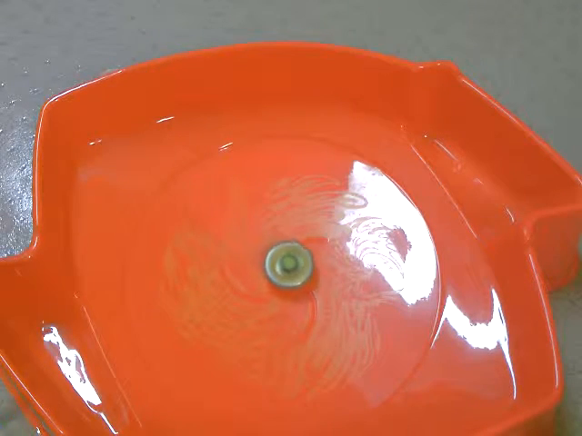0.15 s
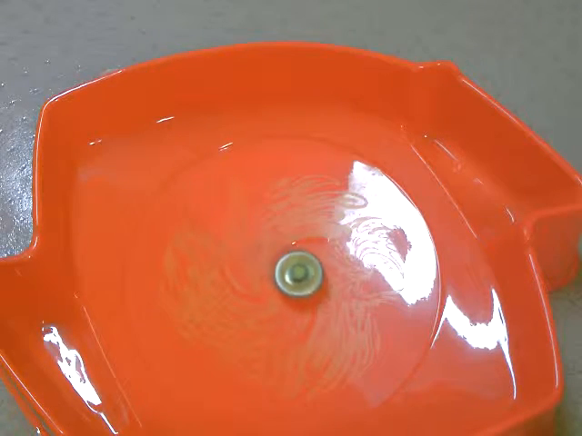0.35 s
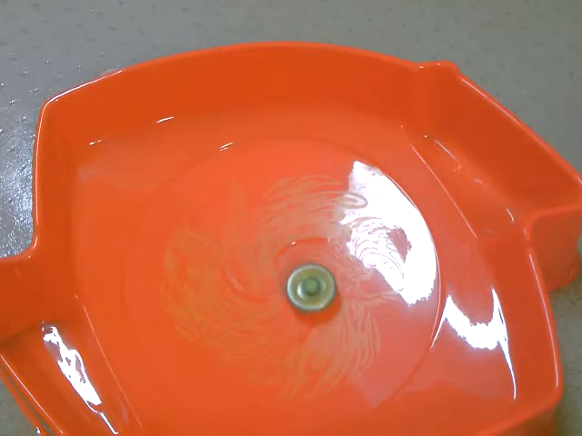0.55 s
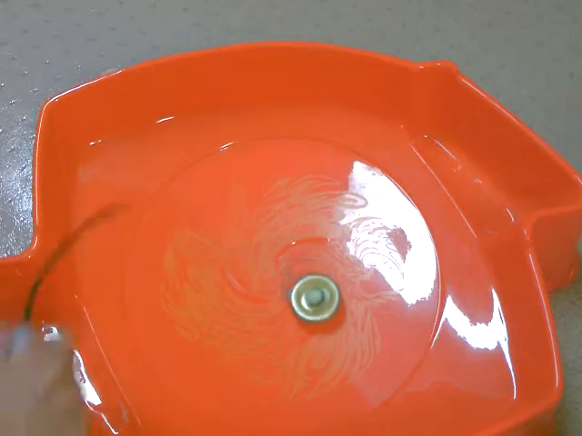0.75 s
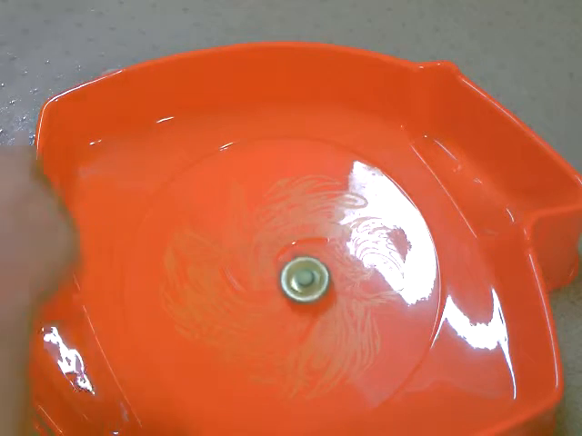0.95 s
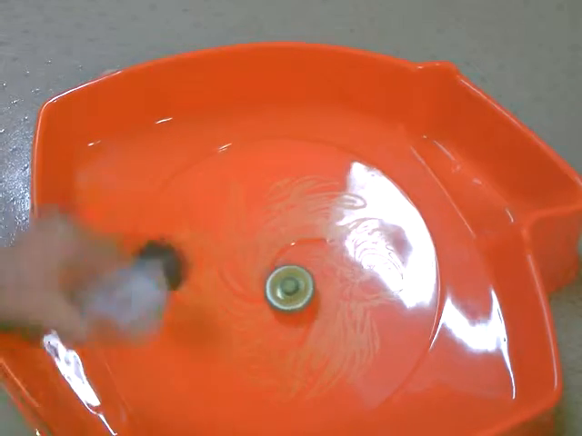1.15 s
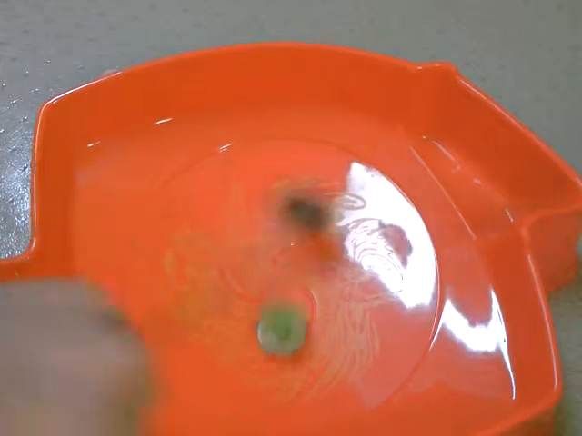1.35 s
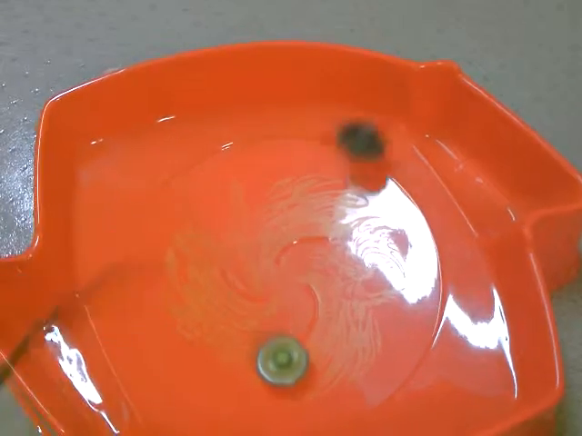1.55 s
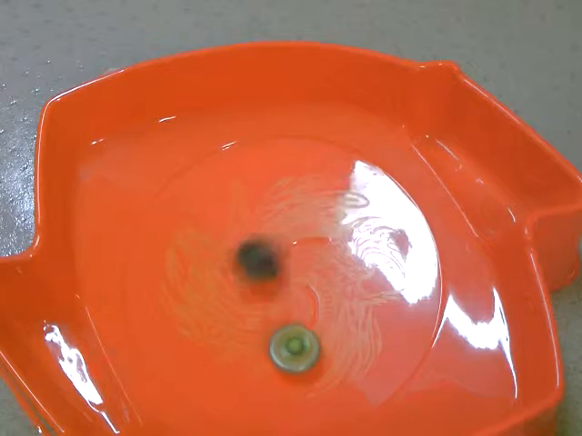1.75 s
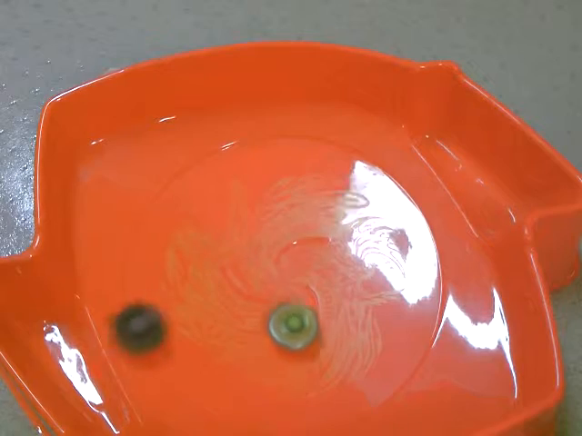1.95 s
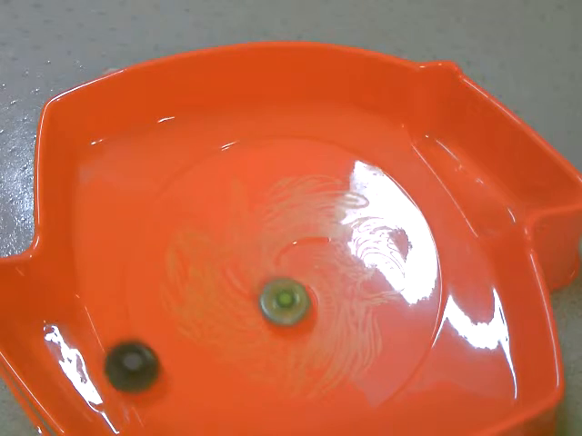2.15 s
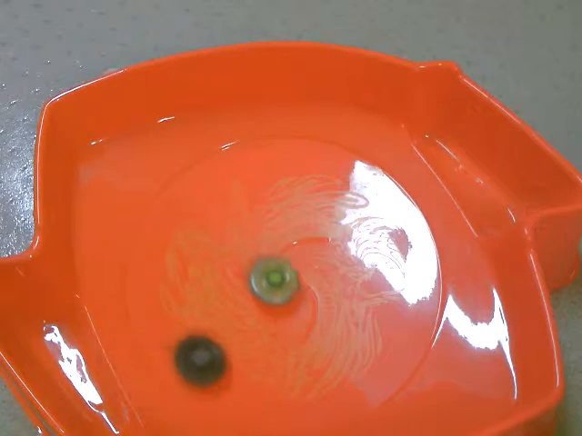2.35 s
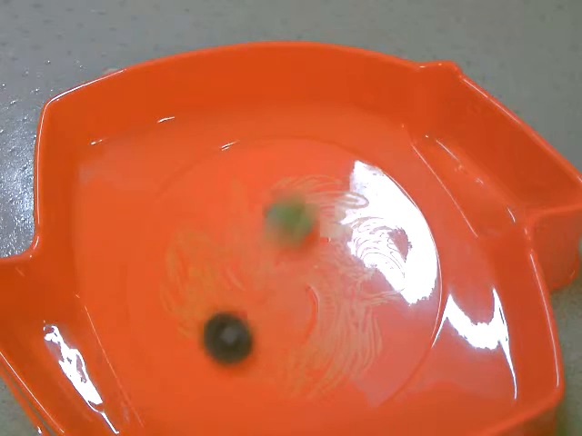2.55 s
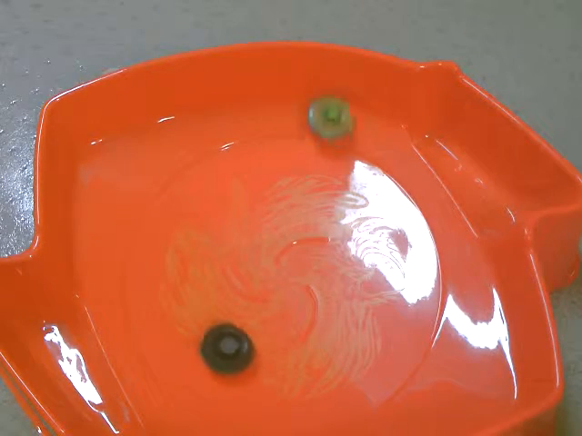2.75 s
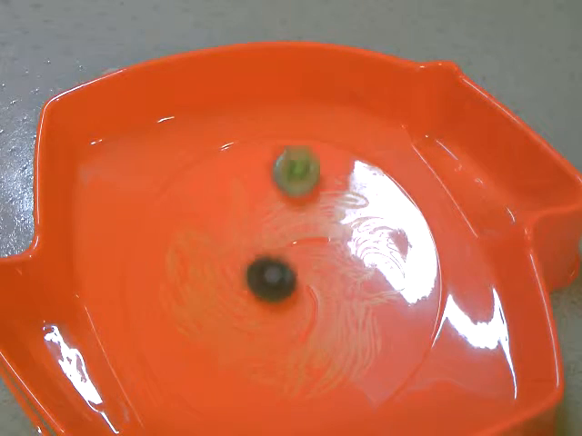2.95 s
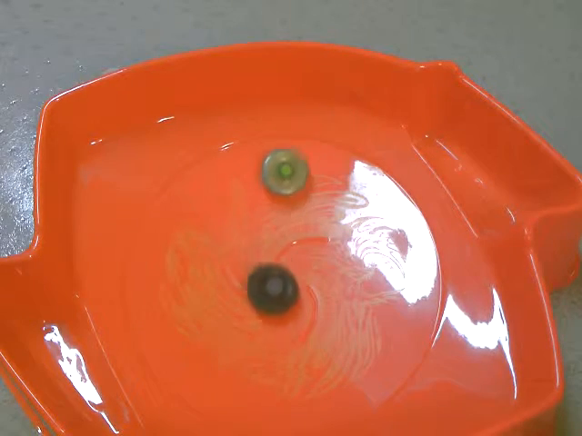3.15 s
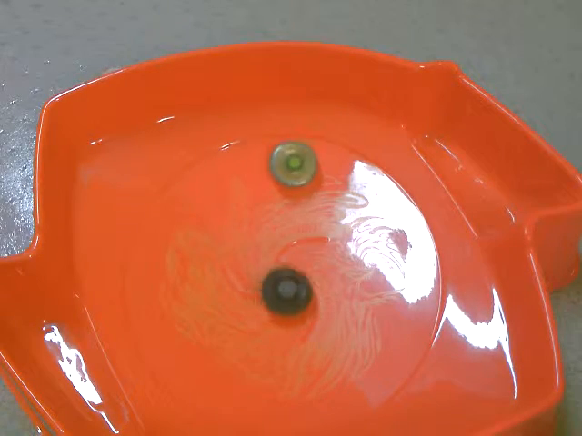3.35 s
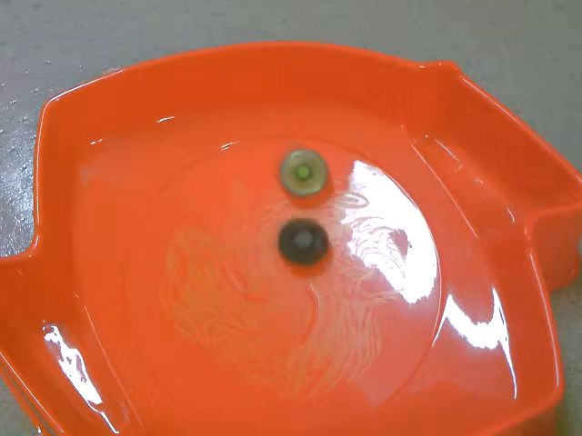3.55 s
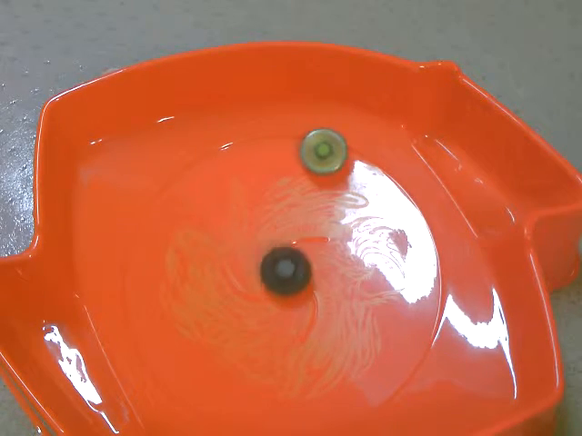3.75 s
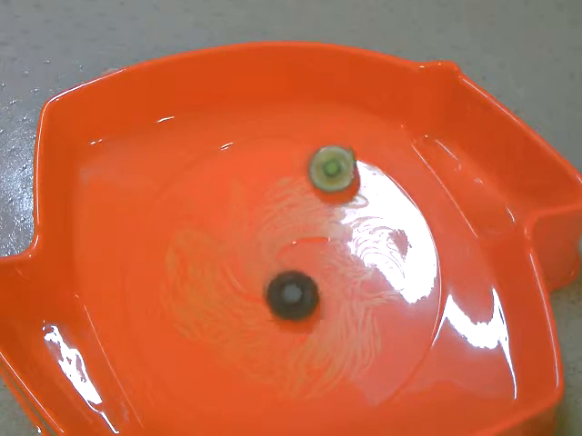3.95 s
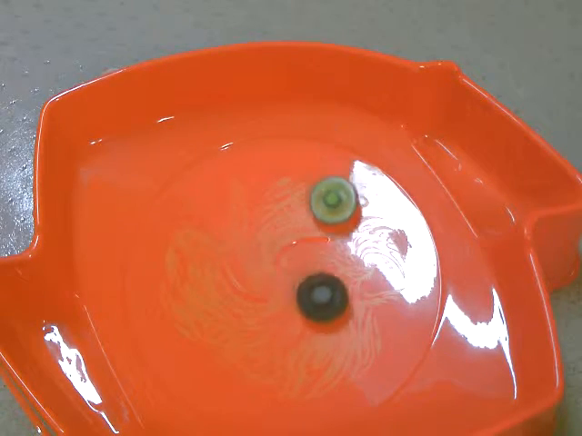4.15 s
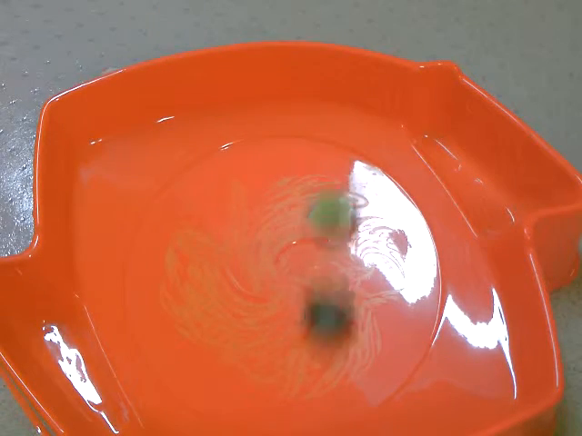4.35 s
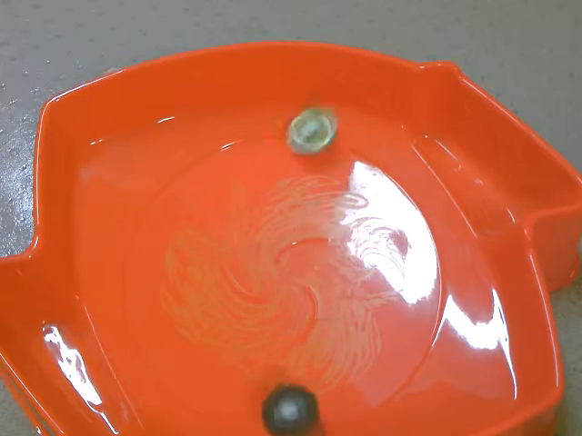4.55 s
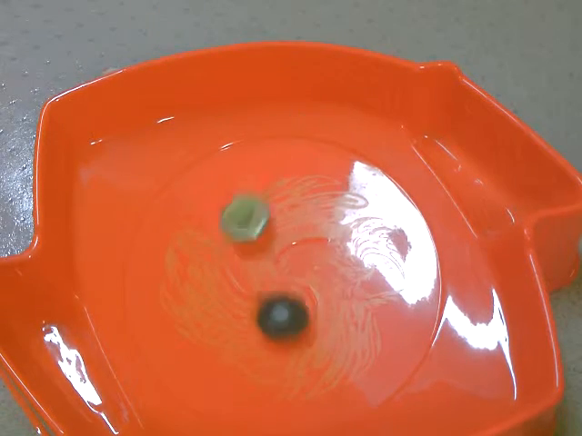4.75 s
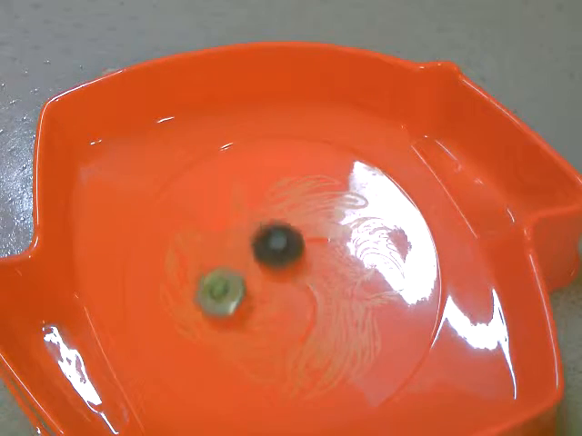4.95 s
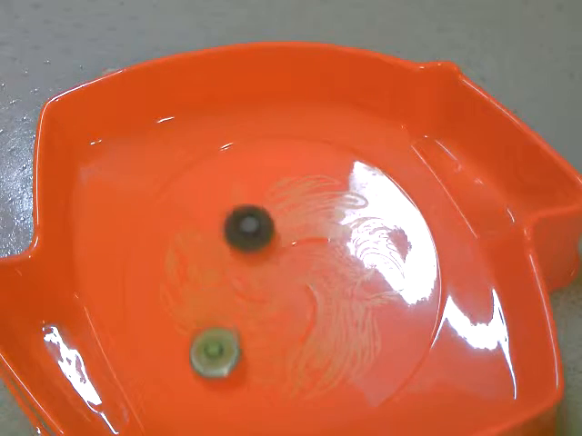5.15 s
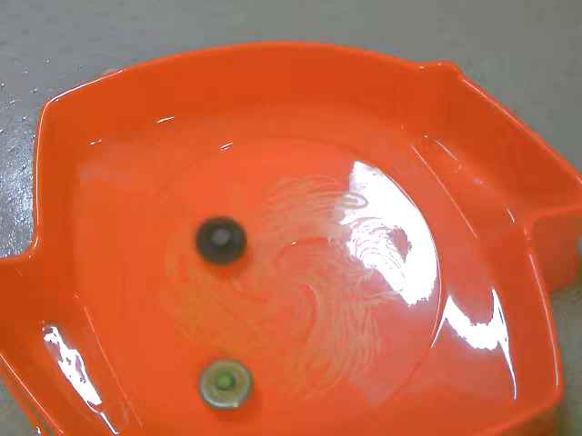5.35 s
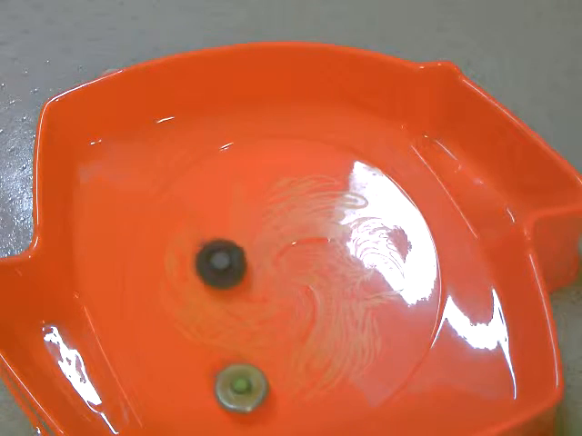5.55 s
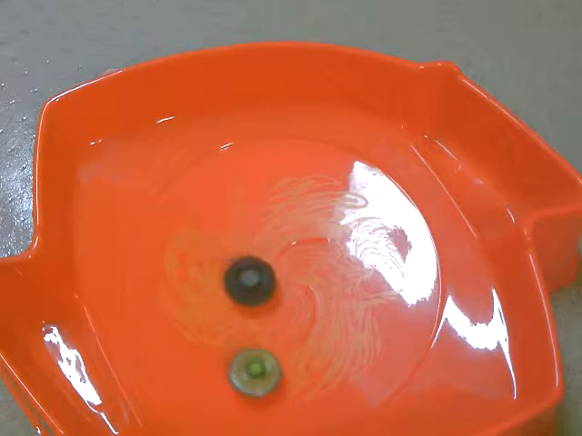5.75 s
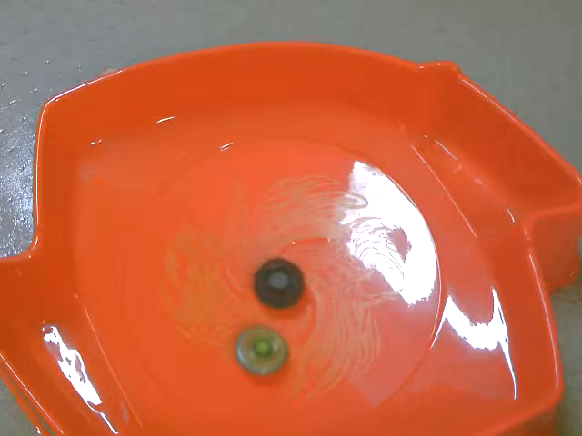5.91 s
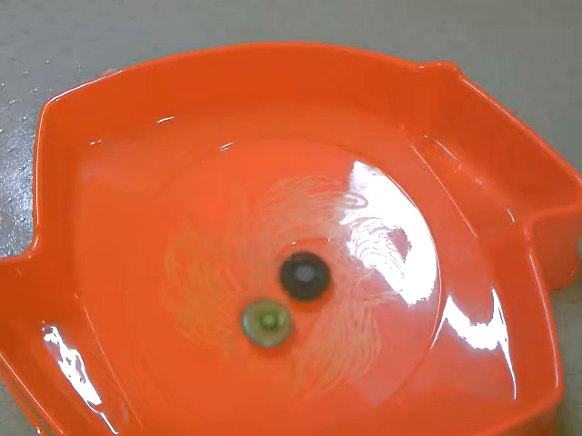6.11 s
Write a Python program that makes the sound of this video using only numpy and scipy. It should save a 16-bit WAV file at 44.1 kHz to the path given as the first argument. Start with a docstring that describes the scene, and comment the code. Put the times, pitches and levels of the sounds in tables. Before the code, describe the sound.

In a small, briefly echoing room with faint steady hiss, one top spins almost silently in a thin plastic bowl. A few faint clicks open, then a quick run of crisp plastic ratchet clicks at 0.25-0.41 seconds as a ripcord enters a launcher. Soft rumbling passes from 0.6. At 1.19 a very short rasping zip accelerates and jerks, with a loud hollow knock at 1.27. A faint touch at 1.49 precedes strong double knocks at 1.62-1.68, then shrinking bounces from 1.79 to 2.1. Quiet rumble and fluttering scuffs continue; a metal crack at 2.69 leads to bowl knocks around 2.86-3.03. Sharp rim clacks come at 3.23 and 3.81. The brightest ringing clash strikes at 4.52, followed by a tight clatter of hollow knocks at 4.62-4.69, pattering bounces until about 5.2, and rumble fading into near quiet by 6.

```python
"""In a small room, two metal spinning tops battle in a thin plastic bowl.
A toothed ripcord clicks into a launcher and is pulled with a fast zip; tops knock, bounce and rumble on the bowl,
and their metal rims clash and ring. Blows are short noise bursts plus fading sine modes; the rumble is random
bumps through filters and the bowl's modes, and the zip and scuffs are noise pulses, one per tooth or turn.
Room echoes follow every sound, over a soft steady hiss."""
import sys
import numpy as np
from scipy import signal
from scipy.fft import rfft, irfft
from scipy.io import wavfile

SR = 44100
rng = np.random.default_rng(int(sys.argv[2]) if len(sys.argv) > 2 else 0)


def log_audio(samples):
    """Write samples as a 16-bit WAV file to the path given in sys.argv[1]."""
    # one column per channel
    frames = np.atleast_2d(samples).T
    # limit to full scale, then quantise
    limited = np.clip(frames, -1, 1)
    pcm = np.round(limited * 32767).astype(np.int16)
    wavfile.write(sys.argv[1], SR, pcm)


N = 272538
TIME = np.arange(N) / SR
AGE = TIME[:SR // 2]   # seconds since a blow, for half a second
CUTOFF_HZ = 9750   # the treble ends here

# the bowl's natural tones: [f/Hz, relative level/dB, time to fall 60 dB t60/s]
BOWL_TONES = [(165, -19, .22), (215, -13, .2), (293, -5, .26), (380, -7, .15), (422, -7, .18),
              (485, 0, .14), (558, 0, .15), (590, -4, .17), (675, 0, .14), (756, -1, .15), (845, -5, .15),
              (935, -5, .16), (1000, -6, .14), (1063, -3, .16), (1130, -8, .14), (1287, -11, .15),
              (1380, -14, .15)]
# speed of the spin: [t/s, turns per s]
SPIN_SPEED = [(2.6, 52.4), (3.1, 46), (4.8, 36), (6.18, 37)]


def knocks(level_db=-5, rise_s=0.00062, flex_lag_s=0.001293, push_db=-3, shell_db=-1, modes_db=-3,
           clack_db=1, clack_t60=0.012, buzz_db=-8, buzz_t60=0.078):
    """The hard contact clacks, the struck spot flexes just after it, and the whole bowl rings on."""
    # a top lands on the bowl or hits its wall: [t/s, level/dB, strongest f/Hz of that spot, treble re level/dB]
    hits = [(1.266, -11, 435, -29), (1.287, -17.5, 820, -27), (1.486, -30, 276, 0),
            (1.498, -24.5, 290, -19), (1.622, -8, 984, -15), (1.676, -11.5, 723, -7.5),
            (2.149, -35, 990, -11), (2.187, -32.5, 960, -15.5), (2.468, -30, 784, -16),
            (2.858, -19, 630, -13), (2.938, -13.5, 733, -8), (3.029, -21, 660, -27),
            (4.293, -40, 563, -10.5), (4.617, -14, 744, -17.5), (4.641, -18.5, 538, -11),
            (4.673, -10, 707, -10.5), (4.685, -12, 640, -30), (5.795, -42, 1036, -15)]
    # colour of the flexing bowl: [f/Hz, relative level/dB]
    shell_colour = [(30, -40.5), (80, -28.5), (140, -17), (220, -15), (400, -5), (650, 5), (1050, -3),
                    (1400, -6.5), (2200, -18.5), (4000, -72.5), (9000, -42)]
    # colour of the hard contact: [f/Hz, relative level/dB]
    clack_colour = [(300, -22), (1000, 1.5), (1600, 1), (2300, 6.5), (3000, 3), (3500, 0.5), (4200, -1.5),
                    (5200, -8), (6500, -11.5), (8000, -9), (9300, -14.5)]
    retouch_s, retouch_db = 0.0039, -8   # a spinning top touches again at once
    out = np.zeros(N)
    push = unit_blow(colour(signal.unit_impulse(len(AGE)), shell_colour))
    rise = swell(rise_s)
    for s, db, hz, treble_db in hits + bounces():
        spot = unit_blow(ring(hz, t60=.028))
        shell = from_db(shell_db) * unit_blow(colour(burst(t60=.07), shell_colour))
        modes = from_db(modes_db) * struck(favoured(BOWL_TONES, hz, width_hz=40, boost_db=8))
        thud = unit_blow(from_db(push_db) * push + rise * (spot + shell + modes))
        contact = burst(clack_t60) + from_db(buzz_db) * burst(buzz_t60)
        clack = unit_blow(colour(rise * contact, clack_colour))
        clack = from_db(db + level_db + treble_db + clack_db) * clack
        add(out, s, clack)
        add(out, s + retouch_s, from_db(retouch_db) * clack)
        add(out, s + flex_lag_s, from_db(db + level_db) * thud)
    return out


def bounces():
    """Every hop is shorter and softer than the last; each touch is a knock on the bowl's floor."""
    # a top hops on its tip:
    # [t/s, first hop/s, share of hop time kept, number of touches, first level/dB, loss per touch/dB]
    hops = [(1.79, .109, .61, 4, -19.5, 4), (4.787, 0.072, .8, 5, -26.5, 2.5),
            (5.062, .055, .9, 3, -31, 4.5)]
    floor_hz, treble_db = 947, -12   # strongest pitch of the floor; treble against the touch's level
    touches = []
    for s, hop_s, kept, count, db, loss_db in hops:
        for k in range(round(count)):
            touches.append((s, db - k * loss_db, floor_hz, treble_db))
            s = s + hop_s * kept ** k
    return touches


def clashes(crack_db=3, rattle_db=-6, rattle_t60=0.036, ring_db=1):
    """A very short crack, a rattle of the tops' parts, and close rim modes that beat and flutter."""
    # a rim strikes the other top or the wall: [t/s, crack level/dB, ring level/dB, favoured ring f/Hz]
    strikes = [(1.4859, -36, -49, 2800), (1.493, -33.5, -41, 9460), (2.6915, -24.5, -44, 6400),
               (3.2266, -25.5, -29, 5820), (3.8081, -25.5, -37, 6260), (4.5190, -23, -20, 5480)]
    # natural tones of the metal rims: [f/Hz, relative level/dB, time to fall 60 dB t60/s]
    rim_tones = [(2230, -1, .13), (2740, 1, .13), (3860, -2, .12), (4390, -5, .12), (5494, 0, .3),
                 (5546, -2, .33), (5690, 1, .32), (5943, -9, .14), (6045, -3, .15), (6180, -2, .14),
                 (6395, -2, .11), (8050, -4, .1), (9460, 5, .11)]
    # colour of the crack: [f/Hz, relative level/dB]
    crack_colour = [(60, -17), (300, -21), (800, -10.5), (1600, -0.5), (2300, 1), (2900, 3.5), (3400, -0.5),
                    (4100, 2.5), (4800, -0.5), (6100, 11), (7300, -5), (8500, 0.5), (9500, -8)]
    out = np.zeros(N)
    turns_per_s = spin_speed()
    for s, hit_db, rim_db, spot_hz in strikes:
        contact = burst(.008)
        rattle = from_db(rattle_db) * burst(rattle_t60)
        crack = unit_blow(colour(contact + rattle, crack_colour))
        rim = struck(favoured(rim_tones, spot_hz, width_hz=170, boost_db=16))
        flutter = whirl(turns_per_s[round(s * SR)], depth=.55)
        ringing = from_db(rim_db + ring_db) * unit_blow(rim * flutter)
        add(out, s, from_db(hit_db + crack_db) * crack + ringing)
    return out


def whirl(turns_per_s, depth):
    """The lobes of a spinning rim sweep past the microphone, so its ring flutters at multiples of the spin."""
    multiples = np.arange(1, 7)[:, None]
    lobes = np.cos(2 * np.pi * (multiples * turns_per_s * AGE + rng.random(multiples.shape)))
    return 1 + depth * np.sum(lobes / np.sqrt(multiples), axis=0)


def tips(bumps_per_s=1500, modes_db=-5, grit_db=-6, grits_per_s=160):
    """The tips run over tiny scratches that shake the bowl; a tilted top scuffs it on every turn."""
    # a top runs across the bowl: [t/s, length/s, rumble level/dB, fall while it lasts/dB per s; below 0 it grows]
    runs = [(0, 0.012, -42, 10), (.635, 0.22, -46.5, -7.5), (.92, 0.21, -44, 17), (1.3, 0.83, -53.5, 5),
            (1.95, 0.39, -44.5, 7.5), (2.46, 0.073, -49, 12), (2.61, 0.206, -49, -9),
            (2.83, 1.105, -42, 9.5), (4.52, .1, -48.5, 1), (4.62, 0.86, -36, 26.5)]
    # a top tilts and rights itself: [t/s, length/s, scuff level/dB, fall while it lasts/dB per s]
    tilts = [(2.57, 0.72, -52.5, 7), (3.31, 0.49, -47.5, 29), (4.76, .7, -47, 44)]
    # colour of the rumble: [f/Hz, relative level/dB]
    rumble_colour = [(29, -68), (50, -43), (108, -6.5), (175, -21), (212, -0.5), (252, -14), (476, -1),
                     (649, -4), (757, 0), (1050, 0.5), (1180, -6.5), (1320, -5.5), (5000, -30),
                     (6500, -49.5), (11000, -120)]
    # colour of scuffs and grit: [f/Hz, relative level/dB]
    scuff_colour = [(100, -20.5), (400, 3.5), (900, 8.5), (1600, 0.5), (3500, -6), (5500, -17.5),
                    (9500, -21)]
    standing_db = -63.5   # rumble of a top that spins on the spot
    travel = np.hypot(spells(runs), from_db(standing_db))
    bumps = rms_one(random_bumps(bumps_per_s))
    bowl = rms_one(signal.oaconvolve(bumps, struck(BOWL_TONES))[:N])
    grit = rms_one(signal.oaconvolve(random_bumps(grits_per_s), burst(t60=0.016))[:N])
    rumble = colour(bumps, rumble_colour) + from_db(modes_db) * bowl
    rumble = rumble + from_db(grit_db) * colour(grit, scuff_colour)
    scuffs = spells(tilts) * repeats(spin_speed(), t60=.03, scatter_db=2)
    return travel * rms_one(rumble) + colour(scuffs, scuff_colour)


def random_bumps(per_s):
    """Single-sample bumps of random strength at random moments."""
    return (rng.random(N) < per_s / SR) * rng.standard_normal(N)


def spells(rows, attack_s=0.027, release_db_per_s=203):
    """Gain of a series of movements: each starts quickly, changes steadily while it lasts, then dies away."""
    power = 1e-12
    for s, length_s, db, easing_db_per_s in rows:
        age = np.maximum(TIME - s, 0)
        fall_db = easing_db_per_s * np.minimum(age, length_s)
        fall_db = fall_db + release_db_per_s * np.maximum(age - length_s, 0)
        power = power + (np.minimum(age / attack_s, 1) * from_db(db - fall_db)) ** 2
    return np.sqrt(power)


def spin_speed():
    """Turns per second at every sample."""
    return np.interp(TIME, *np.transpose(SPIN_SPEED))


def ripcord():
    """The teeth race through the gear and blur into a zip that grows with speed and jerks where the cord catches."""
    # the cord catches and jerks free: [t/s, level/dB]
    catches = [(1.2128, -23), (1.2216, -22.5), (1.234, -6.5)]
    # colour of the zip: [f/Hz, relative level/dB]
    cord_colour = [(150, -33), (600, -10), (1100, -12.5), (1550, 2.5), (2100, -7.5), (2700, 2.5),
                   (3300, -4), (4000, -9.5), (6000, -13.5), (8000, -11.5), (9500, -11.5)]
    start_s, end_s, coast_s = 1.188, 1.240, 0.019   # the pull, then the gear coasts
    slow, fast = 250, 1200   # teeth per second at the start and end of the pull
    zip_db, db_per_doubling, coast_db_per_s = -26, 7, 341.5   # at full speed; rise with speed; dying away
    per_s = np.interp(TIME, [start_s, end_s], [slow, fast])
    db = zip_db + db_per_doubling * np.log2(per_s / fast)
    db = db - coast_db_per_s * np.maximum(TIME - end_s, 0)
    force = from_db(db) * (TIME > start_s) * (TIME < end_s + coast_s)
    for s, jerk_db in catches:
        add(force, s, from_db(jerk_db) * swell(0.000685) * fade(t60=0.033))
    teeth = repeats(per_s, t60=.011, scatter_db=1)
    return colour(force * teeth, cord_colour)


def ratchet(level_db=-6, snap_t60=0.019, spot_db=-6, spot_t60=0.03, modes_db=-3, rattle_db=-5, rattle_t60=0.065):
    """The pawl snaps over each tooth and the small case rings; the advancing cord retunes it click by click."""
    # ripcord teeth clicking into the launcher: [t/s, level/dB, case pitch f/Hz]
    clicks = [(0.0094, -37.5, 1500), (0.0298, -33, 1510), (0.178, -35.5, 1520), (0.2554, -17.5, 2870),
              (0.271, -18, 3100), (0.2948, -19, 1810), (0.3304, -21.5, 1615), (0.368, -19.5, 2000),
              (0.4128, -18, 1726), (0.5194, -45.5, 2880), (0.5517, -46.5, 1190)]
    # natural tones of the launcher's case: [f/Hz, relative level/dB, time to fall 60 dB t60/s]
    case_tones = [(1554, -1, .07), (1730, -3, .08), (1930, -2, .1), (2234, -3, .13), (2420, -3, .16),
                  (2550, -1, .17), (2690, -3, .17), (2835, -2, .19), (2970, -5, .17), (3205, -6, .12),
                  (4218, -8, .09)]
    # colour of the snap: [f/Hz, relative level/dB]
    case_colour = [(150, -65), (500, -25), (950, -19.5), (1300, -6.5), (1600, 4), (2200, -3.5),
                   (2750, -1.5), (3400, -3), (4200, -5.5), (5000, -5.5), (6000, -10.5), (8300, -10.5),
                   (9600, -16)]
    out = np.zeros(N)
    rise = swell(.0007)
    for s, db, hz in clicks:
        noise = rise * burst(snap_t60) + from_db(rattle_db) * burst(rattle_t60)
        snap = unit_blow(colour(noise, case_colour))
        modes = [(f * rng.normal(1, .03), mode_db, t60) for f, mode_db, t60 in case_tones]
        case = from_db(spot_db) * unit_blow(ring(hz, spot_t60)) + from_db(modes_db) * struck(modes)
        add(out, s, from_db(db + level_db) * (snap + rise * case))
    return out


def repeats(per_s, t60, scatter_db):
    """One short scrape per tooth or turn, of uneven strength."""
    turn = np.cumsum(per_s) / SR
    strength = from_db(scatter_db * rng.standard_normal(int(turn[-1]) + 1))[turn.astype(int)]
    since_s = (turn % 1) / per_s   # time since this tooth or turn began
    return rms_one(strength * from_db(-60 * since_s / t60) * rng.standard_normal(N))


def favoured(modes, spot_hz, width_hz, boost_db):
    """The point of contact decides which modes take most of the blow."""
    return [(hz, db + boost_db / (1 + ((hz - spot_hz) / width_hz) ** 2), t60) for hz, db, t60 in modes]


def struck(modes):
    """Every blow shares its energy among the modes a little differently."""
    total = 0
    for hz, db, t60 in modes:
        gain = rng.choice([-1, 1]) * from_db(db + rng.standard_normal())
        total = total + gain * ring(hz, t60)
    return unit_blow(total)


def ring(hz, t60):
    """One struck mode: a sine that dies away."""
    return np.sin(2 * np.pi * hz * AGE) * fade(t60)


def burst(t60):
    """Countless close modes dying together, heard as fading noise."""
    return unit_blow(rng.standard_normal(len(AGE)) * fade(t60))


def fade(t60):
    """Exponential decay from the moment of a blow, falling 60 dB in t60 seconds."""
    return from_db(-60 * AGE / t60)


def swell(rise_s):
    """Vibration takes a moment to spread through a body."""
    return 1 - np.exp(-AGE / rise_s)


def colour(x, spectrum):
    """Causal (minimum-phase) filter with this spectrum; white noise keeps its power."""
    size = 4096
    hz = np.arange(size // 2 + 1) * SR / size
    treble_cut = 1 + (hz / CUTOFF_HZ / 1.2) ** 16
    gain = rms_one(from_db(at_hz(spectrum, hz)) / treble_cut)
    # folding the cepstrum puts the filter's energy as early as possible
    cepstrum = irfft(np.log(gain + 1e-6))
    cepstrum[1:size // 2] *= 2
    cepstrum[size // 2 + 1:] = 0
    return signal.oaconvolve(x, irfft(np.exp(rfft(cepstrum))))[:len(x)]


def at_hz(points, hz):
    """Read a table on a log-frequency axis."""
    f, value = np.transpose(points)
    return np.interp(np.log(hz + 1e-6), np.log(f), value)


def from_db(db):
    """Decibels to gain."""
    return 10 ** (np.asarray(db) / 20)


def rms_one(x):
    """Scale to unit power."""
    return x / np.sqrt(np.mean(x ** 2) + 1e-20)


def unit_blow(x):
    """Scale a blow to the energy of 10 ms at unit power."""
    return x / np.sqrt(np.sum(x ** 2) / (SR / 100) + 1e-20)


def add(out, s, sound):
    """Mix a sound in at time s."""
    start = max(round(s * SR), 0)
    out[start:start + len(sound)] += sound[:N - start]


def room(x, tail_db=-11, echo_db=-17, echo_s=.0105):
    """A near wall gives one clear echo; a short diffuse tail of fading noise bands swells up to it."""
    # the room's decay: [f/Hz, time to fall 60 dB t60/s]
    decay = [(150, 0.11), (600, 0.15), (2500, 0.2), (9000, 0.21)]
    edges = np.geomspace(60, 15360, 9)   # eight octave bands
    tail = 0
    for low, high in zip(edges, edges[1:]):
        band_filter = signal.butter(2, [low, high], "band", fs=SR, output="sos")
        band = signal.sosfilt(band_filter, rng.standard_normal(len(AGE)))
        tail = tail + band * fade(at_hz(decay, np.sqrt(low * high)))
    tail = tail * np.minimum(AGE / echo_s, 1) ** 2
    response = from_db(tail_db) * tail / np.sqrt(np.sum(tail ** 2))
    response[round(echo_s * SR)] += from_db(echo_db)
    return x + signal.oaconvolve(x, response)[:N]


def hiss(level_db=-58.5):
    """Soft steady background: filtered white noise."""
    # colour of the hiss: [f/Hz, relative level/dB]
    air_colour = [(24, -67.5), (40, -42), (209, -15.5), (362, -11), (510, -2.5), (599, -7), (1040, -3),
                  (1110, -24.5), (1220, -5), (1430, -10), (2210, -11), (2720, -14), (9600, -26),
                  (12500, -69), (21100, -120)]
    return from_db(level_db) * colour(rng.standard_normal(N), air_colour)


def scene():
    """Tops, bowl and launcher in the room, over a soft steady hiss."""
    battle = knocks() + clashes() + tips() + ripcord() + ratchet()
    return (room(battle) + hiss())[None]


def record(dry, bass_cut_hz=120):
    """The small microphone loses the bass and rounds the highest peaks; the top is cut steeply."""
    thin = signal.sosfilt(signal.butter(2, bass_cut_hz, "high", fs=SR, output="sos"), dry)
    rounded = np.tanh(thin)
    return signal.sosfilt(signal.ellip(12, .2, 70, CUTOFF_HZ, fs=SR, output="sos"), rounded)


dry = scene()
out = record(dry)
log_audio(out)
```